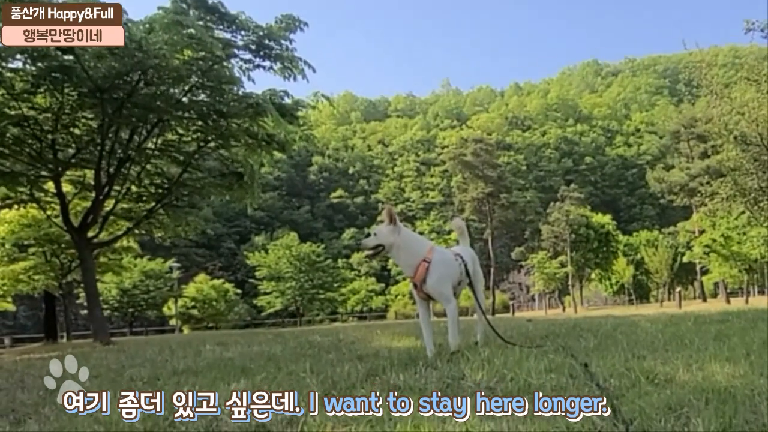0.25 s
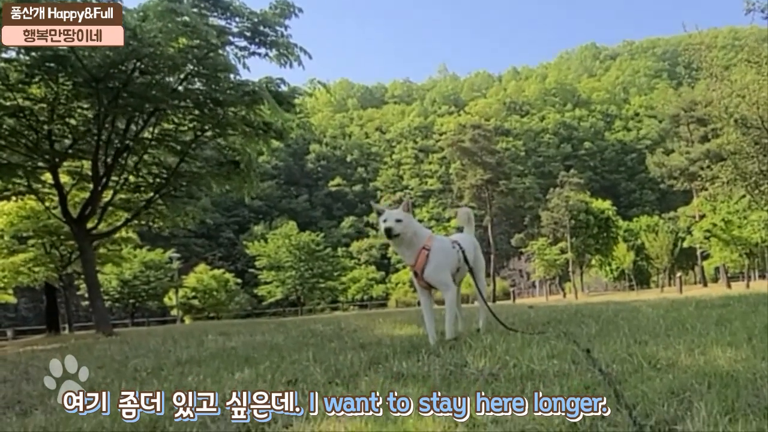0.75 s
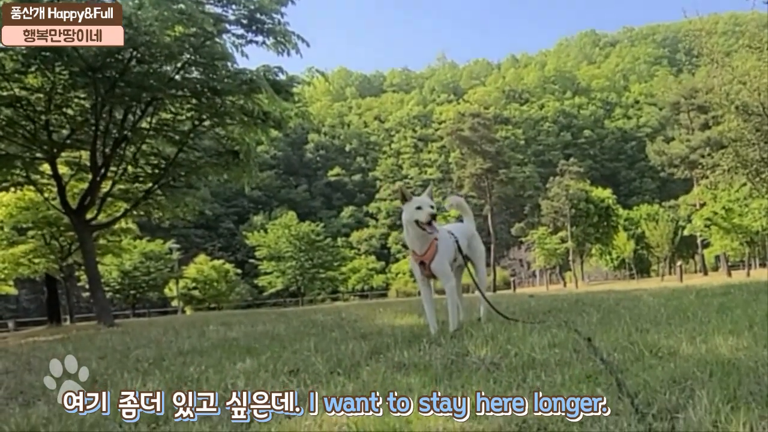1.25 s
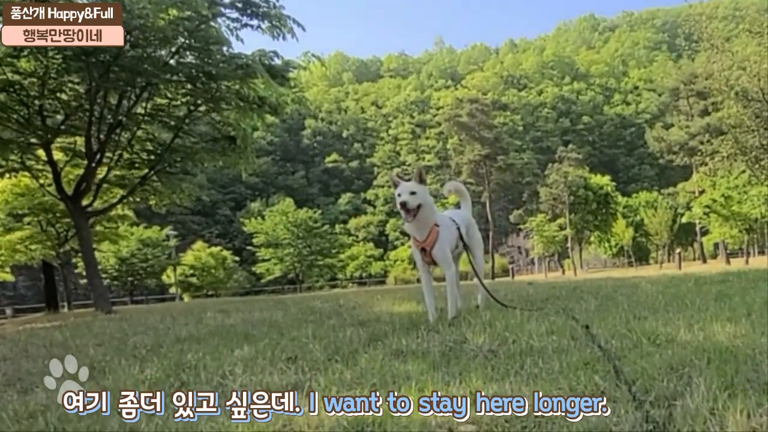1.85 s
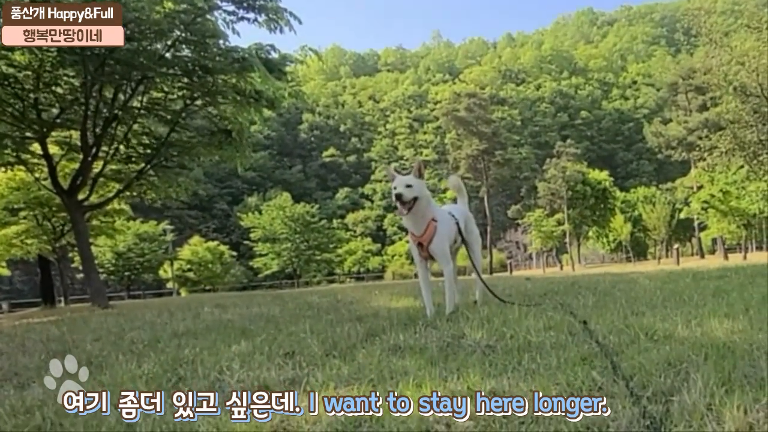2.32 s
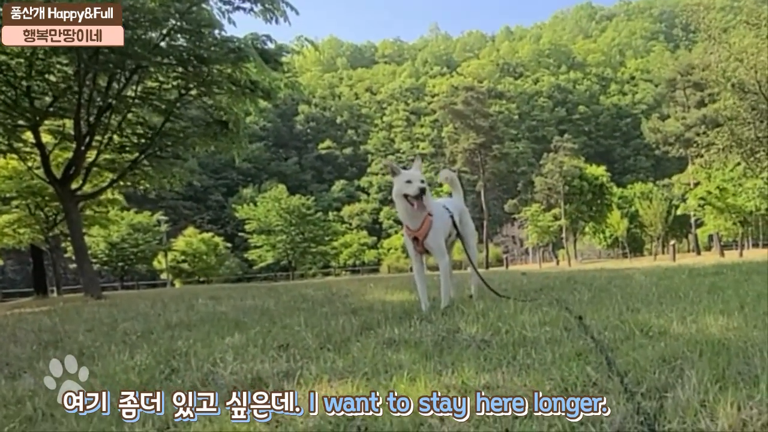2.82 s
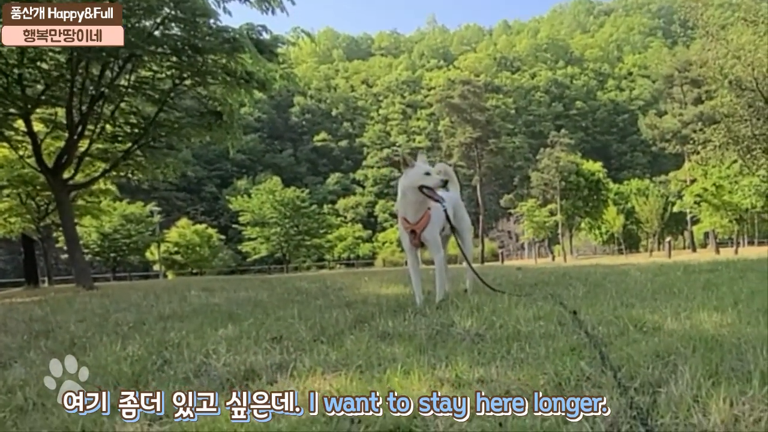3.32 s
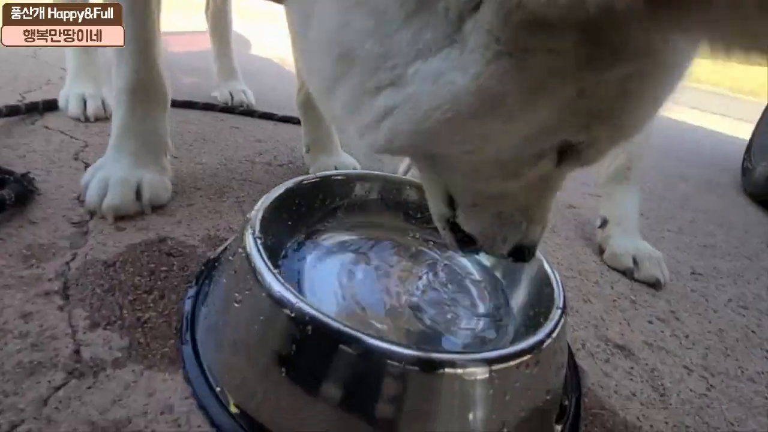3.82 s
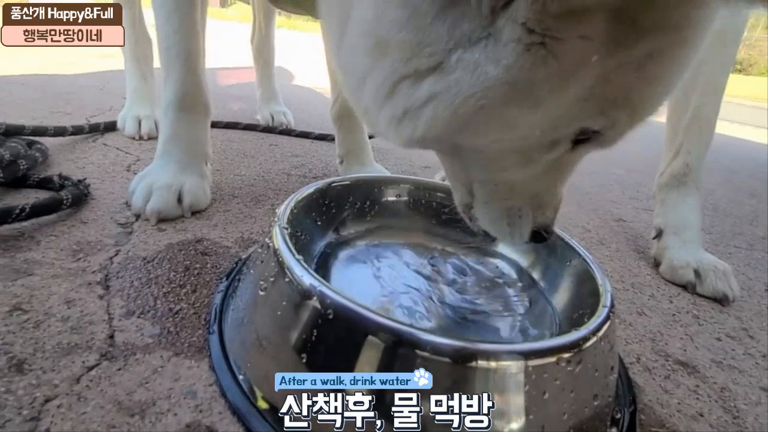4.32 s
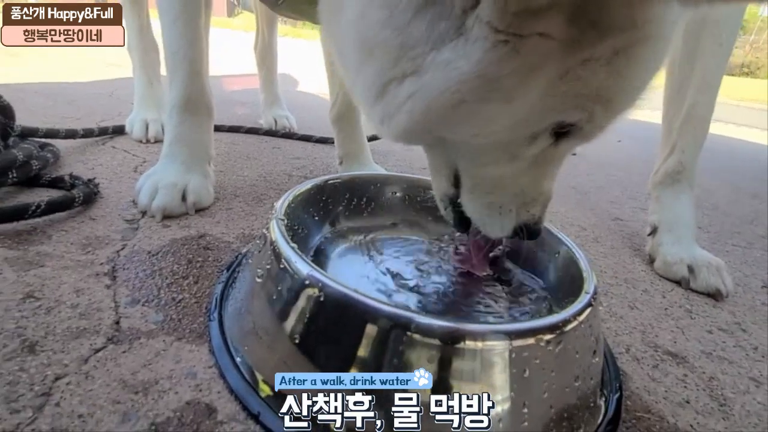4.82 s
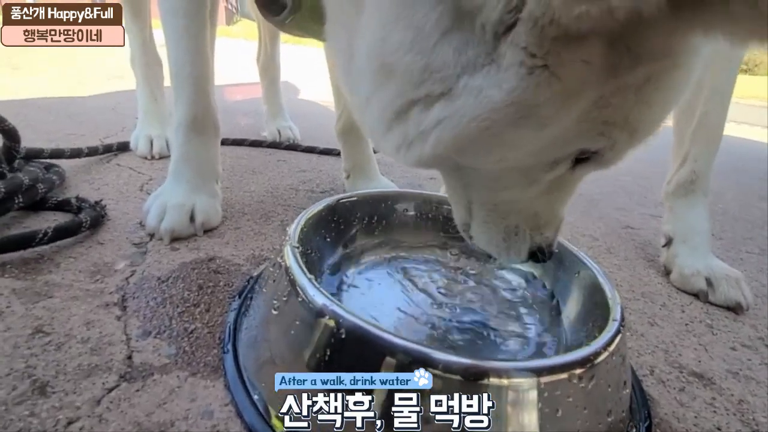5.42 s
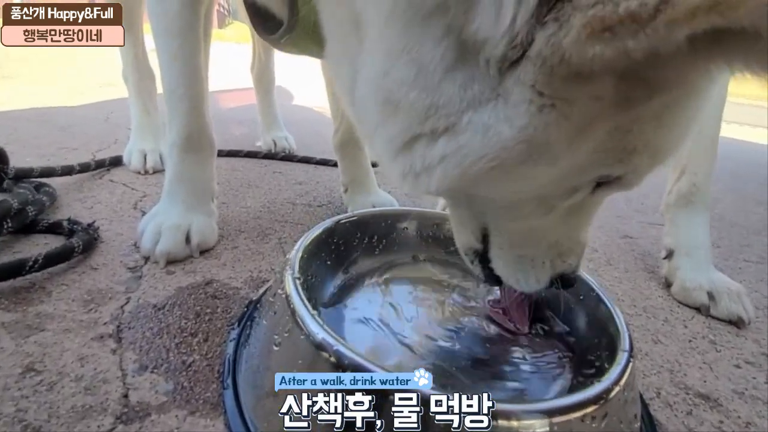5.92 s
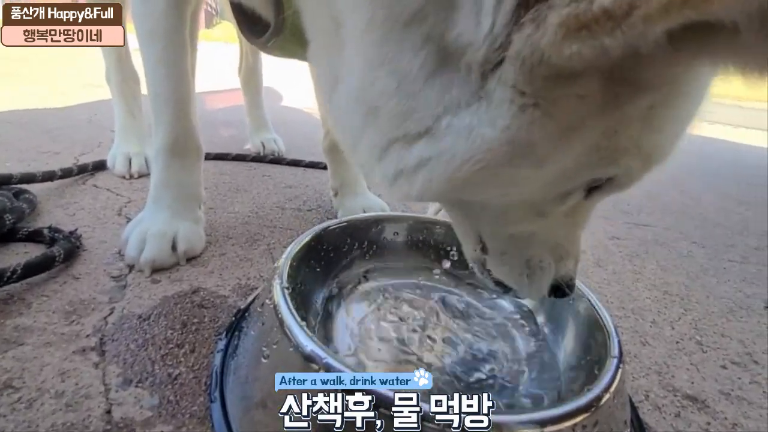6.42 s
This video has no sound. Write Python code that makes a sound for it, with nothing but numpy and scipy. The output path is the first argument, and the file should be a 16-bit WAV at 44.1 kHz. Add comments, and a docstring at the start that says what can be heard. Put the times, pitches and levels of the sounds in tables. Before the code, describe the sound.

Birds whistle and warble outdoors, followed by a dog drinking from a metal bowl with quick wet splashes over a low rumble.

```python
"""Low wind in a park, with far traffic that passes and fades, twig-like ticks and faint rustling.
Small birds whistle and warble in gliding, near-pure tones that the trees throw back.
After a cut we are in a yard, where an engine idles and a dog laps from a steel bowl close to the
microphone: the tongue opens sloshing cavities, trapped air rings as bubbles, fine spray fizzes and the
steel rings along. A few more bird calls carry into the yard."""
import sys
import numpy as np
from scipy import signal
from scipy.fft import rfft, irfft, next_fast_len
from scipy.io import wavfile
from scipy.ndimage import uniform_filter1d

SR = 44100
rng = np.random.default_rng(int(sys.argv[2]) if len(sys.argv) > 2 else 0)


def master_out(mix):
    """Clip the mix to full scale and print it as 16-bit PCM to the path in sys.argv[1]."""
    frames = np.transpose(np.atleast_2d(mix))
    ceiling = np.clip(frames, -1, 1)
    pcm = np.round(ceiling * 32767).astype(np.int16)
    wavfile.write(sys.argv[1], SR, pcm)


N = 293926
TIME_S = np.arange(N) / SR
CUT_S, BAND_LIMIT_HZ = 3.705, 15800
PARK_LAG_MS, YARD_LAG_MS, BOWL_LAG_MS = 0.36, 0.38, 0.095  # the left microphone hears each this late


def amp(db):
    return 10 ** (np.asarray(db) / 20)


def unit_rms(x):
    return x / np.sqrt(np.mean(x ** 2) + 1e-20)


def curve_at(points, hz):
    freqs, values = np.transpose(points)
    return np.interp(np.log(hz + 1), np.log(freqs + 1), values)


def add(mix, start_s, sound):
    part = mix[round(start_s * SR):][:len(sound)]
    part += sound[:len(part)]


def fader(rows):
    """Gain through (time_s, level_db) points; silent outside them."""
    times, db = np.transpose(rows)
    return amp(np.interp(TIME_S, times, db, -200, -200))


def bursts(rows, rise_db_per_s, sag_db_per_s, fall_db_per_s):
    """Gain over time: each row rises, holds while sagging, and falls; the loudest counts."""
    t = np.arange(0, N + 32, 32) / SR
    start, length, top_db = np.transpose(rows)[:, :, None]
    db = top_db - sag_db_per_s * np.clip(t - start, 0, length)
    db -= np.maximum(rise_db_per_s * (start - t), 0)
    db -= np.maximum(fall_db_per_s * (t - start - length), 0)
    return np.interp(TIME_S, t, amp(db.max(axis=0)))


def resonate(x, hz, width_hz):
    """A resonance at a steady or moving pitch: shift hz down to zero, smooth, shift back."""
    carrier = np.exp(2j * np.pi * np.cumsum(hz * np.ones(len(x))) / SR)
    pole = np.exp(-np.pi * width_hz / SR)
    return 2 * (carrier * signal.lfilter([1 - pole], [1, -pole], x / carrier + 1e-18)).real


def coloured(x, points):
    """Filters x by (freq_hz, gain_db) points."""
    size = next_fast_len(N)
    return irfft(rfft(x, size) * amp(curve_at(points, np.fft.rfftfreq(size, 1 / SR))), size)[:N]


# How alike the two microphones hear diffuse sound: freq_hz, coherence
MIC_COHERENCE = [(30, 0.35), (70, 0.87), (250, 0.92), (600, 0.4), (8000, 0.039)]


def wash(colour, patchy_db, in_park):
    """Stereo noise with drifting spectral patches, in the park before the cut or the yard after it."""
    cut = round(CUT_S * SR)
    start, end, lag_ms = (0, cut, PARK_LAG_MS) if in_park else (cut, N, YARD_LAG_MS)
    frames, hz = (end - start) // 256 + 5, np.fft.rfftfreq(1024, 1 / SR)[:, None]
    left_re, left_im, own_re, own_im, patches = rng.standard_normal((frames, 513, 5)).T
    patches = unit_rms(uniform_filter1d(uniform_filter1d(patches, size=10, axis=0), size=12, axis=1))
    coherence = curve_at(MIC_COHERENCE, hz)
    lead = np.exp(2j * np.pi * hz * lag_ms / 1000)
    left = left_re + 1j * left_im
    right = coherence * left * lead + np.sqrt(1 - coherence ** 2) * (own_re + 1j * own_im)
    spectra = np.array([left, right]) * amp(curve_at(colour, hz) + patchy_db * patches)
    out = np.zeros((2, N))
    out[:, start:end] = unit_rms(signal.istft(spectra, nperseg=1024, noverlap=768)[1][:, :end - start])
    return out


# Open air in the park: freq_hz, gain_db
WIND_COLOUR = [(20, -17.5), (50, 2.5), (90, 2.5), (160, -10), (350, -23), (600, -26), (1100, -24.5),
               (2000, -36.5), (4000, -42), (6200, -60), (7200, -79)]
# Wind at the microphone: time_s, level_db
WIND_LEVEL = [(0, -40.5), (1.58, -41), (2.86, -41), (3.7, -42)]


def wind():
    """Moving air makes a low, nearly steady rush."""
    return fader(WIND_LEVEL) * wash(WIND_COLOUR, patchy_db=0.5, in_park=True)


# A road far off: freq_hz, gain_db
TRAFFIC_COLOUR = [(110, -27.5), (160, -7), (257, -1), (400, -6), (520, -17.5), (1300, -25.5), (2500, -37),
                  (5000, -93)]
# Its swell and retreat: time_s, level_db
TRAFFIC_LEVEL = [(0, -48), (1.0, -45), (1.7, -41.5), (2.4, -50.5), (3.0, -60.5), (3.7, -65)]


def traffic():
    """Distant traffic crosses from right to left and moves off."""
    rightward_db = np.interp(TIME_S, [0, 2.5], [3.0, -2.5])
    pan = amp(np.outer([-1, 1], rightward_db))
    return fader(TRAFFIC_LEVEL) * wash(TRAFFIC_COLOUR, patchy_db=2.1, in_park=True) * pan


# Dry ticks, dead centre: start_s, level_db (before filtering)
TWIG_TICKS = [(0.0341, -28), (0.522, -36.5)]


def twig_ticks():
    """Twig-like snaps: dull noise that dies in milliseconds."""
    out, t = np.zeros(N), np.arange(0, .007, 1 / SR)
    for start, db in TWIG_TICKS:
        add(out, start, amp(db) * rng.standard_normal(400)[:len(t)] * np.exp(-t / 0.001))
    return coloured(out, [(500, 12), (1100, 10.5), (4000, -8.5), (9000, -15), (12000, -30)])


# Foliage around the microphone: time_s, level_db
LEAF_LEVEL = [(0.3, -94), (0.6, -68), (1.1, -71), (1.6, -90.5), (2.3, -79), (3.7, -98)]
# Its treble band: freq_hz, gain_db
LEAF_SPECTRUM = [(2500, -32), (3600, 1.5), (5500, 0.5), (6900, -9), (7500, -59)]


def leaves():
    """Foliage rustles softly in two swells."""
    return fader(LEAF_LEVEL) * wash(LEAF_SPECTRUM, patchy_db=2.5, in_park=True)


# Overtones of the nearer bird, relative to a note at HUSK_REFERENCE_DB: freq_hz, gain_db
BIRD_OVERTONES = [(4000, -25), (5600, -25.5), (7200, -65), (8300, -24), (12500, -22), (13800, -51),
                  (16000, -55)]
HUSK_REFERENCE_DB, NEAR_FROM_S, NEAR_TOP_HZ = -55.5, 1.9, 4000


def whistle(start_s, hz, gain, husky=0.8):
    """A fluttering near-sine; the nearer bird adds husky overtones that swell less than the note."""
    flutter, husk = rng.standard_normal((2, 20000))
    flutter = 1 + 0.2 * unit_rms(uniform_filter1d(flutter, size=200))[:len(hz)]
    husk = 1 + husky * unit_rms(uniform_filter1d(uniform_filter1d(husk, size=24), size=24))[:len(hz)]
    phase = 2 * np.pi * np.cumsum(hz) / SR
    tone = np.sin(phase)
    if NEAR_FROM_S < start_s < CUT_S and hz.mean() < NEAR_TOP_HZ:
        overtones = sum(amp(curve_at(BIRD_OVERTONES, k * hz)) * (k * hz < SR / 2) * np.sin(k * phase)
                        for k in range(2, 9))
        tone += husk * overtones * (amp(HUSK_REFERENCE_DB) / gain) ** 0.39
    return np.sqrt(2) * gain * flutter * tone * signal.windows.tukey(len(hz), .12)


# Birds in the trees, one list of points a note: time_s, pitch_hz, level_db
BIRD_NOTES = [
    [(0.53, 1310, -76), (0.62, 1265, -68.5), (0.82, 1280, -67), (0.9, 1240, -73)],
    [(0.96, 1645, -64), (0.974, 1403, -62), (0.99, 1336, -64), (1.035, 1335, -63)],
    [(1.248, 1910, -55), (1.27, 1537, -73), (1.285, 1696, -57), (1.312, 2340, -49), (1.325, 2460, -56),
     (1.348, 2260, -52)],
    [(1.412, 2650, -59), (1.434, 3020, -53), (1.452, 1884, -50.5), (1.463, 1730, -61), (1.482, 2010, -62)],
    [(2.215, 1940, -53), (2.229, 1860, -52.5), (2.259, 1833, -57), (2.275, 1810, -75)],
    [(1.112, 3800, -71), (1.128, 2770, -58.5), (1.142, 2240, -58), (1.165, 1940, -69)],
    [(2.178, 2510, -44), (2.198, 2440, -48.5), (2.203, 2480, -46), (2.208, 2800, -49), (2.214, 2500, -56)],
    [(2.495, 2905, -62), (2.508, 3074, -49), (2.516, 3115, -34.5), (2.524, 3200, -45), (2.53, 3920, -48),
     (2.537, 3040, -36.5), (2.548, 2830, -47), (2.575, 2930, -57)],
    [(2.735, 2310, -52), (2.757, 2283, -46), (2.763, 3040, -49), (2.769, 2850, -52), (2.777, 2080, -46),
     (2.803, 2070, -46), (2.816, 1950, -55)],
    [(2.9, 5200, -72), (2.912, 6400, -66), (2.92, 4770, -60), (2.93, 4300, -59), (2.98, 4080, -70)],
    [(3.765, 3300, -57), (3.774, 3040, -51), (3.784, 2600, -50)],
    [(4.277, 6850, -53), (4.302, 7050, -52)],
    [(4.318, 6550, -53), (4.342, 6400, -52)],
    [(4.435, 6440, -52), (4.478, 6390, -54)],
    [(3.834, 3160, -48), (3.843, 2914, -46), (3.85, 2630, -44), (3.856, 2020, -42)],
]


def gliding_notes():
    """Whistles glide through their points: nearer song, and high calls from further off."""
    song, far = np.zeros((2, N))
    for points in BIRD_NOTES:
        times, hz, db = np.transpose(points)
        t = np.arange(times[0], times[-1], 1 / SR)
        glide_hz = uniform_filter1d(np.interp(t, times, hz), size=150)
        note = whistle(times[0], glide_hz, amp(np.interp(t, times, db)))
        add(far if hz[0] > NEAR_TOP_HZ else song, times[0], note)
    return song, far


# Early reflections off the trees: delay_s, gain_db
TREE_REFLECTIONS = [(.005, -5.5), (0.011, -12)]


def among_trees(song, far):
    """Trees return the notes in a haze that builds and fades; higher notes lean further left."""
    reflected = coloured(song, [(2500, -2), (4000, 4), (7000, -14)])
    echoes = sum(amp(db) * np.roll(reflected, round(delay * SR)) for delay, db in TREE_REFLECTIONS)
    t = np.arange(SR // 2) / SR
    haze = rng.standard_normal((2, len(t))) * amp(-60 * t / 0.49) * np.minimum(t / 0.015, 1)
    into_trees = amp(-10.0) * reflected + amp(-3.5) * far
    tail = signal.fftconvolve(into_trees[None], haze / np.linalg.norm(haze[0]), axes=1)[:, :N]
    early = song + echoes + .5 * far
    right = coloured(early, [(1700, 0.0), (2200, -5.5), (3000, -9.5)])
    return np.array([amp(2.5) * early, right]) + tail


# Grass left of the microphone: start_s, length_s, level_db
GRASS_RUSTLES = [(.585, 0.12, -69), (.802, 0.055, -69)]
# Its hiss: freq_hz, gain_db
GRASS_COLOUR = [(6500, -45), (8000, -8), (9200, -7), (12500, -18), (13500, -17), (15500, -19)]


def grass():
    """Grass rustles in brief puffs of high treble."""
    puffs = bursts(GRASS_RUSTLES, rise_db_per_s=850, sag_db_per_s=30, fall_db_per_s=550)
    return puffs * wash(GRASS_COLOUR, patchy_db=2.4, in_park=True) * amp([[2.5], [-2.5]])


# The nearer bird's trill: start_s, end_s, centre_hz, swing_hz, rate_hz, final_level_db
BIRD_TRILL = (2.072, 2.178, 2435.5, 465, 66.5, -47)


def trill():
    """A whistle swings fast about one pitch and grows louder."""
    start, end, centre_hz, swing_hz, rate_hz, final_db = BIRD_TRILL
    out, t = np.zeros(N), np.arange(0, end - start, 1 / SR)
    hz = centre_hz - swing_hz * np.cos(2 * np.pi * rate_hz * (t - .003))
    add(out, start, whistle(start, hz, amp(final_db - 11 * (1 - t / t[-1])), husky=0.86))
    return out


# The nearer bird's warbles: start_s, top_hz, slide_s, length_s, top_db
BIRD_WARBLES = [(2.996, 3390, 0.04, 0.065, -48.5), (3.07, 3180, 0.036, 0.099, -45),
                (3.357, 3380, 0.037, 0.064, -51), (3.427, 3150, 0.042, 0.11, -47)]


def warbles():
    """Each note flicks up, slides down, then swings in pitch while it sinks and fades."""
    flick_s, low_hz, high_hz, rate_hz = 0.0094, 1810, 2460, 58
    narrow_hz_per_s, sink_hz_per_s = 2600, 4700
    trough_db, swing_db, fade_db_per_s = -58, 10.5, 93  # loudest at the top of each swing
    out = np.zeros(N)
    for start, top_hz, slide_s, length_s, top_db in BIRD_WARBLES:
        t = np.arange(0, length_s, 1 / SR)
        swung_s = np.maximum(t - slide_s, 0)
        swing = .5 - .5 * np.cos(2 * np.pi * rate_hz * swung_s)
        hz = np.interp(t, [0, flick_s, slide_s], [0.7 * top_hz, top_hz, low_hz])
        hz += swing * (high_hz - low_hz - narrow_hz_per_s * swung_s) - sink_hz_per_s * swung_s
        db = np.interp(t, [0, flick_s, slide_s / 2, slide_s],
                       [top_db - 23, top_db, top_db + 2.5, trough_db])
        db += swing_db * swing - fade_db_per_s * swung_s
        add(out, start, whistle(start, uniform_filter1d(hz, size=120), amp(db), husky=1.5))
    return out


# Background of the yard: freq_hz, gain_db
RUMBLE_COLOUR = [(20, -50), (50, -2), (110, -1.5), (160, -3), (256, -2), (400, -5.5), (700, -13),
                 (1300, -18), (2000, -26), (4500, -37.5), (6300, -50.5), (7300, -87)]
# Its level at the microphone: time_s, level_db
RUMBLE_LEVEL = [(3.705, -57), (3.72, -32.5), (4.3, -34), (5.2, -32), (6.66, -32)]


def yard_rumble():
    """Low noise fills the yard from the cut on."""
    return fader(RUMBLE_LEVEL) * wash(RUMBLE_COLOUR, patchy_db=1.66, in_park=False)


# An engine behind the other yard sounds: time_s, level_db
ENGINE_LEVEL = [(3.706, -58), (3.76, -45.5), (4.5, -40.5), (5.2, -41), (5.85, -36.5), (6.3, -35.5),
                (6.66, -37.5)]
FIRING_HZ, SWAY_DB, SWAY_WIDTH_HZ = 74.5, 1.5, 2.6


def engine():
    """Idle firing makes a wavering tone in a narrow band of noise; it swells and sinks by chance."""
    firing_hz = FIRING_HZ * (1 + 0.01796 * unit_rms(resonate(rng.standard_normal(N), 0, 3.35)))
    shared, left, right = rng.standard_normal((3, N))
    fuzz = [unit_rms(resonate(resonate(shared + 0.084 * own, firing_hz, 23), firing_hz, 34))
            for own in (left, right)]
    drone = 2.45 * np.sin(2 * np.pi * np.cumsum(firing_hz) / SR) + 0.96 * np.array(fuzz)
    sway = amp(SWAY_DB * unit_rms(resonate(shared[::-1], 0, SWAY_WIDTH_HZ)))
    return drone * fader(ENGINE_LEVEL) * sway


# Hums above the drone, dead centre: start_s, end_s, pitch_hz, level_db
YARD_HUMS = [(3.73, 4.302, 282.5, -47), (4.6, 5.503, 231.7, -40.5), (5.148, 5.297, 375, -34.5),
             (5.558, 6.672, 265, -39.5), (5.905, 6.664, 329, -51.5)]


def hums(width_hz=8.3):
    """Very narrow bands of noise come and go as wavering tones."""
    out = np.zeros(N)
    for start, end, hz, db in YARD_HUMS:
        t = np.arange(0, end - start, 1 / SR)
        hum = resonate(resonate(rng.standard_normal(70000), hz, width_hz), hz, width_hz)[-len(t):]
        add(out, start, unit_rms(hum) * amp(db) * signal.windows.tukey(len(t), 0.027 / t[-1]))
    return out


# Each throw of water by the tongue, close up: start_s, length_s, level_db
TONGUE_THROWS = [(3.76, 0.032, -55.5), (3.845, 0.063, -50.5), (3.96, 0.05, -48.5), (4.19, 0.091, -69.5),
                 (4.3, 0.051, -50.5), (4.4, 0.065, -48), (4.535, 0.31, -45), (4.87, 0.035, -54),
                 (4.955, 0.049, -49.5), (5.055, 0.039, -47.5), (5.166, 0.012, -55), (5.212, 0.0076, -51.5),
                 (5.288, 0.052, -48.5), (5.4, 0.032, -50), (5.71, 0.03, -53.5), (5.755, 0.041, -47),
                 (5.828, 0.029, -50.5), (5.912, 0.014, -55.5), (5.99, 0.011, -52), (6.045, 0.063, -47.5),
                 (6.14, 0.052, -48.5), (6.378, 0.069, -48), (6.5, 0.033, -51), (6.58, 0.037, -52)]


def wetness(dripping_db=-80.5):
    """How much water flies: the throws over a faint steady dripping."""
    throws = bursts(TONGUE_THROWS, rise_db_per_s=802, sag_db_per_s=8.5, fall_db_per_s=803)
    return throws + amp(dripping_db) * (TIME_S > CUT_S)


# Droplets and mist at the bowl: freq_hz, gain_db
SPRAY_SPECTRUM = [(500, -6.5), (1200, -3.5), (2130, -7.5), (3040, -5.5), (5500, -6.5), (8000, -12),
                  (8750, -2), (9400, -10.5), (12000, -11.5), (15900, -20.5)]


def droplets(per_s=1100):
    """Tiny bubbles of random size and pitch, louder the wetter the moment."""
    size_draw, time_draw, pitch_draw = rng.random((N, 3)).T
    hits = amp(-4.8 * np.log(size_draw + 0.022)) * (time_draw < per_s / SR) * wetness()
    out, pitches = np.zeros(N), np.geomspace(700, 14000, num=24)
    pitch_index = np.floor(pitch_draw * len(pitches))
    for k, hz in enumerate(pitches):
        gain = amp(curve_at(SPRAY_SPECTRUM, hz)) * np.sqrt(hz / 8000)
        ping = gain * bubble(hz, ring_s=1.9 / hz + 0.00023, rise=0.03, slap=0.28)
        out += signal.oaconvolve(hits * (pitch_index == k), ping)[:N]
    return out


def mist():
    """Drops too fine to tell apart fizz and sputter round the bowl, louder on the left."""
    sputter = amp(2.4 * unit_rms(uniform_filter1d(rng.standard_normal(N), size=220)))
    fizz = wash(SPRAY_SPECTRUM, patchy_db=4.3, in_park=False)
    return wetness() * unit_rms(sputter) * fizz * amp([[4], [-1.5]])


# Single drops landing on the steel: start_s, level_db (before filtering)
STEEL_DROPS = [(3.8785, -37), (3.9698, -32.5), (4.5415, -48), (5.0166, -22), (5.0822, -36), (5.1705, -37),
               (5.2109, -39), (5.3237, -29), (6.1658, -32), (6.387, -30)]


def drop_ticks(peak_s=0.00078):
    """Each impact is a crisp puff of treble noise."""
    out, age = np.zeros(N), np.arange(0, 6, 1 / (SR * peak_s))
    for start, db in STEEL_DROPS:
        add(out, start, amp(db) * rng.standard_normal(600)[:len(age)] * age * np.exp(1 - age))
    return coloured(out, [(1500, -25), (5000, -6), (9000, -3.5)])


def bubble(hz, ring_s, rise, slap):
    """A pocket of air rings and climbs in pitch as it surfaces; its film slaps with wide noise."""
    age = np.arange(0, 5 * ring_s, 1 / SR) / ring_s
    swell = age * np.exp(1 - age)
    rising_hz = hz * (1 + rise * (age - 1))
    tone = np.sin(2 * np.pi * np.cumsum(rising_hz) / SR + 2 * np.pi * rng.random())
    film = resonate(resonate(rng.standard_normal(1600), hz, 0.48 * hz), hz, 0.48 * hz)
    return swell ** 3.1 * tone + slap * unit_rms(film)[-len(age):] * swell ** 1.16


# Distinct bubbles in the bowl: peak_s, pitch_hz, level_db
BOWL_BUBBLES = [(3.9725, 3280, -31.5), (3.9845, 2020, -28), (3.9876, 2140, -29), (3.9973, 1270, -29),
                (4.005, 5360, -44), (4.0003, 2093, -32.5), (4.006, 4150, -36), (4.145, 1335, -36.5),
                (4.411, 6050, -37), (4.438, 2374, -32.5), (4.542, 2020, -35.5), (4.634, 924, -33.5),
                (4.642, 2140, -37), (4.762, 1405, -33), (4.773, 2080, -34.5), (4.8293, 473, -26.5),
                (4.9621, 710, -29.5), (5.079, 2220, -32), (5.093, 2265, -27.5), (5.2914, 2140, -31.5),
                (5.2958, 2240, -31), (5.326, 3240, -33), (5.4067, 6240, -32.5), (5.42, 1590, -25),
                (5.4208, 5536, -25), (5.4219, 2210, -23), (5.426, 9500, -28), (5.4338, 2010, -30),
                (5.4334, 1073, -24.5), (5.4822, 900, -29), (5.7548, 8950, -35), (5.766, 3030, -29.5),
                (5.793, 4360, -40), (5.8547, 2160, -33), (5.861, 1680, -30.5), (5.912, 830, -31),
                (5.922, 3360, -36.5), (5.9235, 895, -29.5), (5.9327, 3810, -35), (6.0476, 900, -33),
                (6.0566, 2170, -35.5), (6.0693, 2100, -31), (6.089, 2180, -36), (6.1781, 2150, -31),
                (6.187, 2100, -29.5), (6.244, 950, -25.5), (6.2505, 4340, -21.5), (6.2525, 5570, -25),
                (6.254, 2375, -31), (6.3146, 8950, -40), (6.3845, 2090, -31), (6.4108, 3794, -26),
                (6.518, 1170, -23.5), (6.519, 2680, -17), (6.519, 1720, -33), (6.5303, 1960, -21.5),
                (6.5813, 836, -19), (6.581, 5370, -29.5)]


def bubbles():
    """Each bubble sheds two weaker ones just after it, at nearby pitches."""
    out = np.zeros(N)
    for peak_s, hz, db in BOWL_BUBBLES:
        ring_s = 0.0031 * (1000 / hz) ** .55  # small bubbles die sooner
        add(out, peak_s - ring_s, amp(db) * bubble(hz, ring_s, rise=0.06, slap=0.41))
        for late, higher in rng.random((2, 2)):
            shed_hz = min(hz * 2 ** (0.857 * higher - 0.3), BAND_LIMIT_HZ)
            shed = bubble(shed_hz, 0.87 * ring_s, rise=0.084, slap=0.24)
            add(out, peak_s + 0.008 * late, amp(db - 7.5) * shed)
    return out


# The tongue entering the water: time_s, level_db, cavity_hz
TONGUE_PLUNGES = [(4.04, -26, 385), (4.05, -21, 467), (4.065, -25.5, 634), (4.405, -18, 403),
                  (4.5024, -19.5, 572), (4.739, -20.5, 282), (4.929, -30, 376), (5.136, -17.5, 603),
                  (5.203, -18.5, 600), (5.282, -24.5, 337), (5.4, -24.5, 326), (5.4195, -21, 653),
                  (5.828, -24, 420), (6.148, -23, 387), (6.383, -33, 530)]


def plunges():
    """The cavity behind the tongue sucks, then sloshes for a few uneven, fading cycles."""
    out = np.zeros(N)
    for time_s, db, hz in TONGUE_PLUNGES:
        cycles = np.arange(0, 8, hz / SR)
        wobble = unit_rms(uniform_filter1d(rng.standard_normal(3000), size=90))[:len(cycles)]
        phase = 2 * np.pi * np.cumsum(hz * (1 + 0.26 * wobble)) / SR
        add(out, time_s - .001, -amp(db) * np.sin(phase) * np.exp(-cycles / 1.9))
    return out


# Modes of the steel bowl: pitch_hz, width_hz, relative_db
BOWL_MODES = [(2140, 126, 8), (4800, 230, 12)]


def steel_bowl(water):
    """The water sounds set the steel ringing."""
    ring = sum(amp(db) * resonate(water, hz, width) for hz, width, db in BOWL_MODES)
    return water + amp(-9.5) * ring


# The bowl is brighter in the left microphone: freq_hz, left_minus_right_db
BOWL_TILT = [(500, 2.5), (1500, 1), (6000, 8), (13000, 6.5)]


def close_microphones(bowl):
    """The pair hears the bowl with a tilt, a lag, and scatter from its rim and the paving."""
    size = next_fast_len(N)
    hz = np.fft.rfftfreq(size, 1 / SR)
    tilt = amp(curve_at(BOWL_TILT, hz) / 2)
    pair = np.array([tilt * np.exp(-2j * np.pi * hz * BOWL_LAG_MS / 1000), 1 / tilt])
    direct = irfft(rfft(bowl, size) * pair, size)[:, :N]
    t = np.arange(SR // 10) / SR
    scatter = np.gradient(rng.standard_normal((2, len(t))), axis=1) * amp(-60 * t / 0.019) * (t > .0006)
    scatter /= np.linalg.norm(scatter[0])
    return direct + amp(-5.5) * signal.fftconvolve(direct, scatter, axes=1)[:, :N]


def scene():
    """The park, then the yard with the dog at its bowl; the birds carry across the cut."""
    until_cut = np.clip((CUT_S - TIME_S) / 0.012, 0, 1)
    park = (wind() + leaves() + traffic() + grass()) * until_cut
    song, far_calls = gliding_notes()
    birds = among_trees(song + warbles() + trill(), far_calls)
    park += twig_ticks()
    yard = engine() + hums() + yard_rumble()
    water = amp(7) * droplets() + drop_ticks() + bubbles() + plunges()
    dog = close_microphones(steel_bowl(water)) + mist()
    return park + birds + yard + dog


def record(dry):
    """The recorder cuts off the highest treble."""
    lowpass = signal.firwin(511, BAND_LIMIT_HZ, window=("kaiser", 9), fs=SR)
    return signal.oaconvolve(dry, lowpass[None], "same")


dry = scene()
out = record(dry)
master_out(out)
```